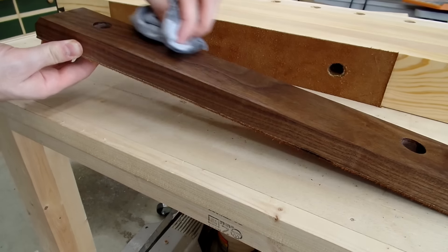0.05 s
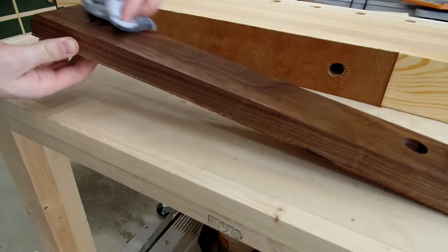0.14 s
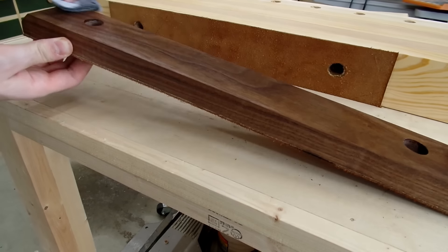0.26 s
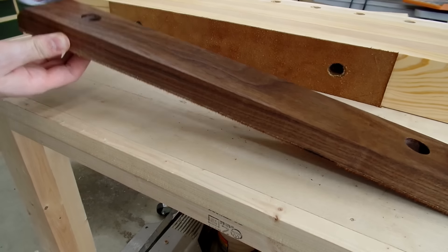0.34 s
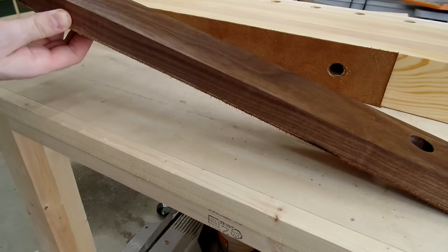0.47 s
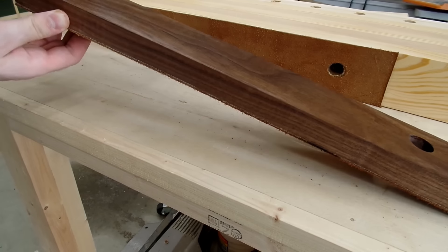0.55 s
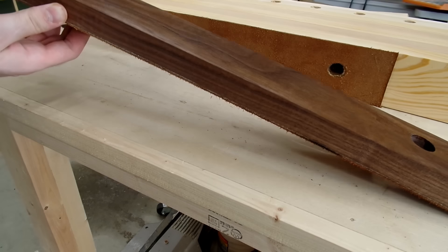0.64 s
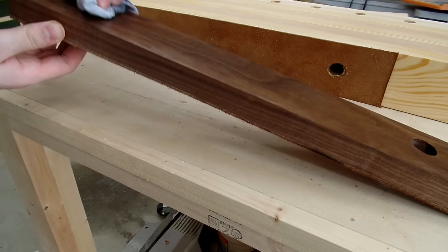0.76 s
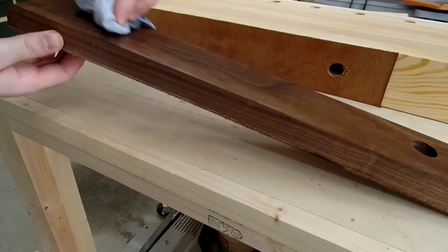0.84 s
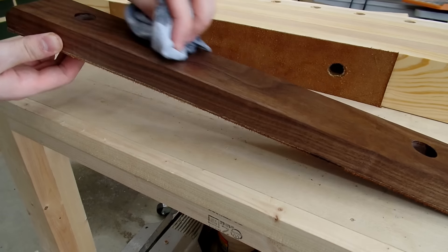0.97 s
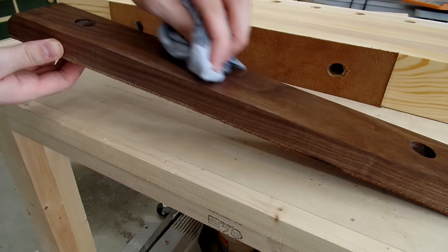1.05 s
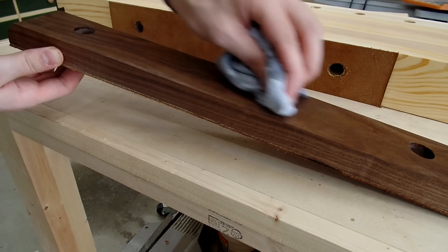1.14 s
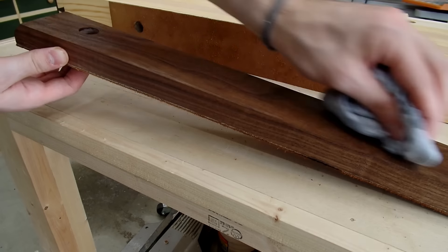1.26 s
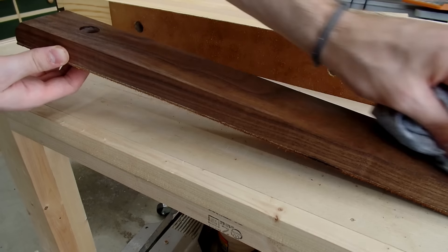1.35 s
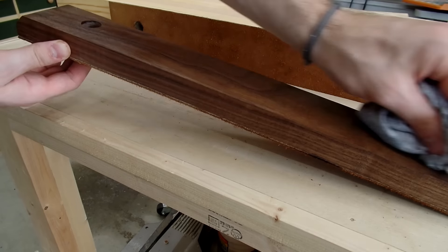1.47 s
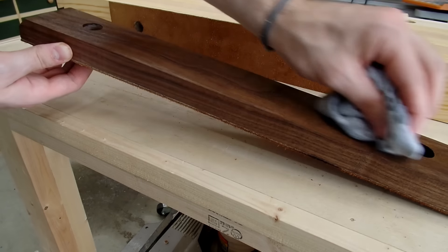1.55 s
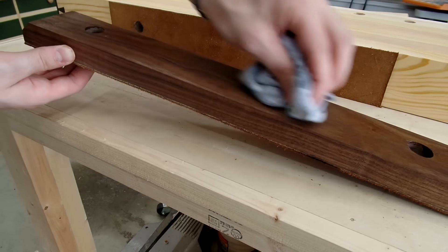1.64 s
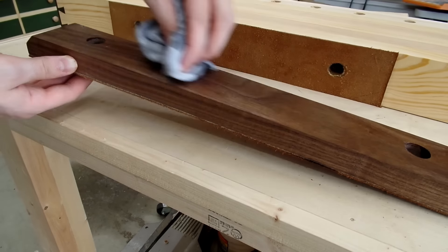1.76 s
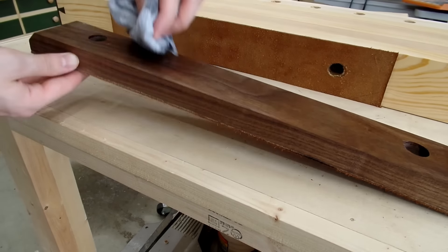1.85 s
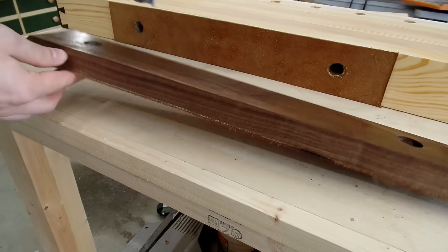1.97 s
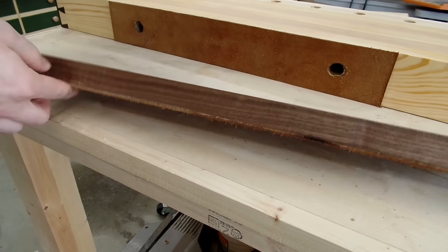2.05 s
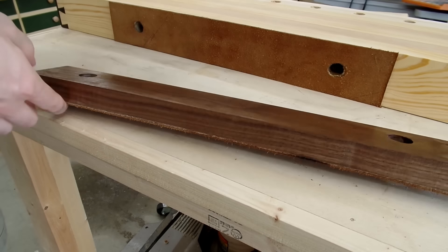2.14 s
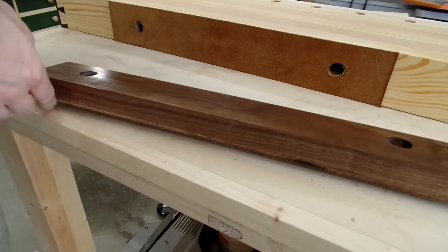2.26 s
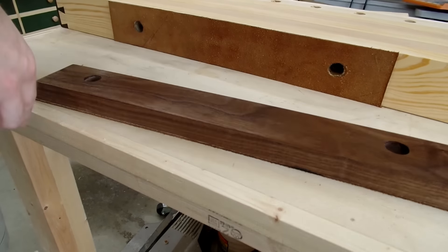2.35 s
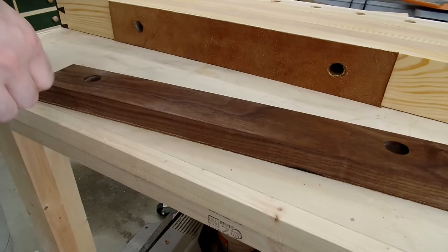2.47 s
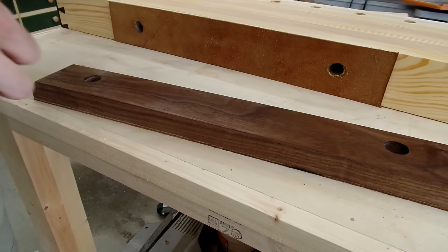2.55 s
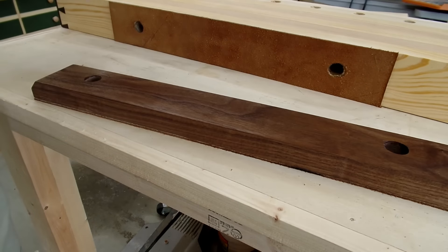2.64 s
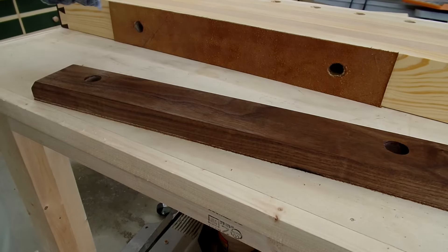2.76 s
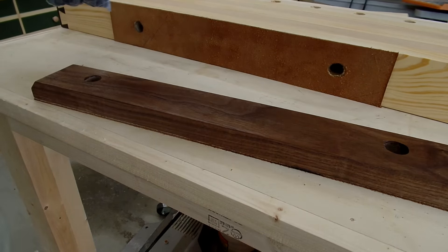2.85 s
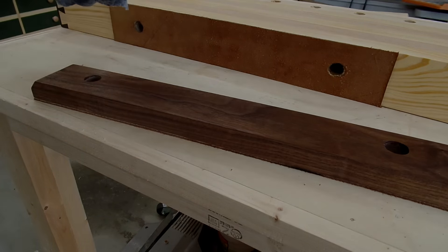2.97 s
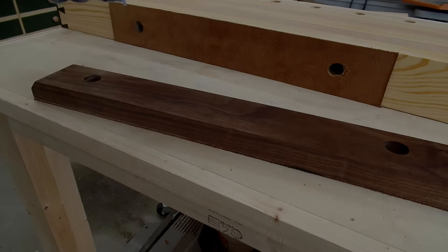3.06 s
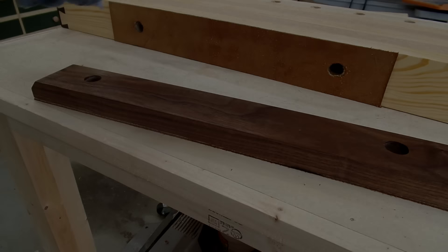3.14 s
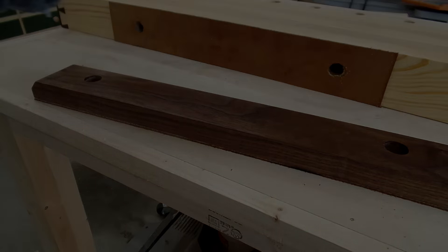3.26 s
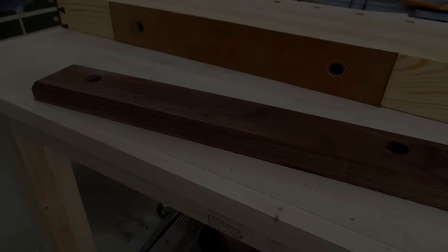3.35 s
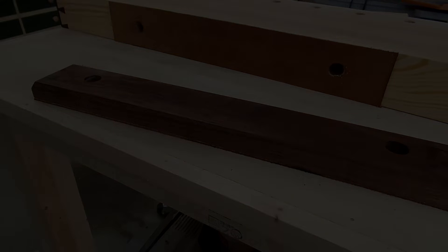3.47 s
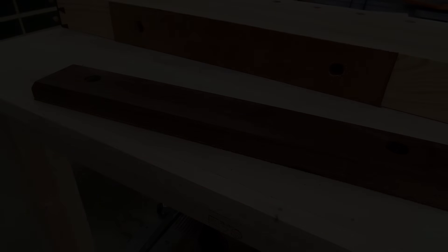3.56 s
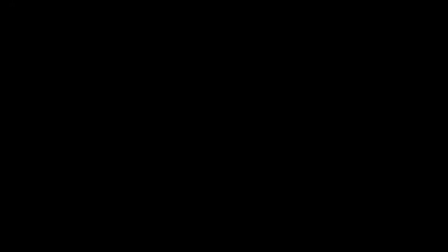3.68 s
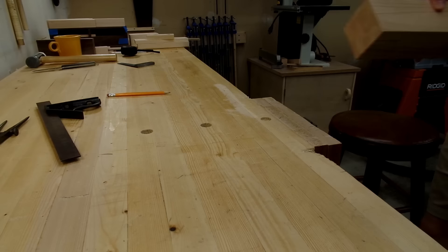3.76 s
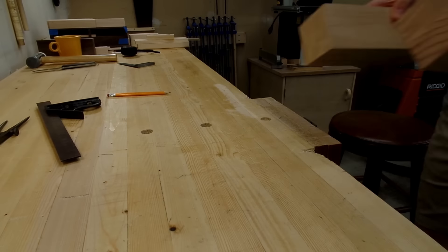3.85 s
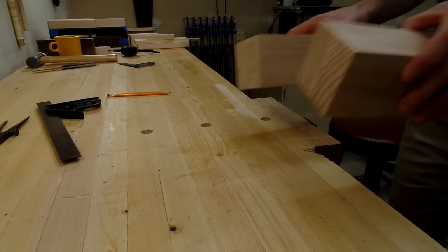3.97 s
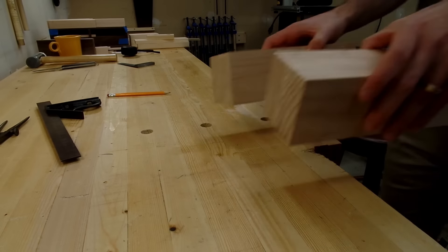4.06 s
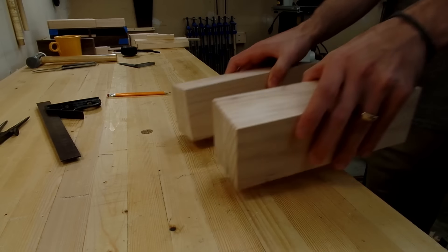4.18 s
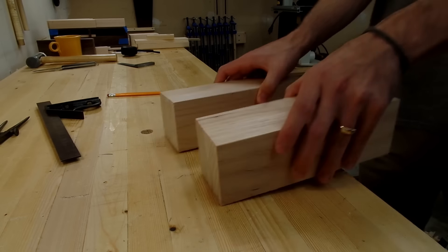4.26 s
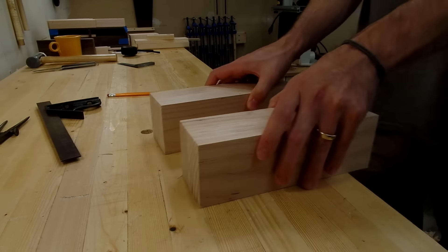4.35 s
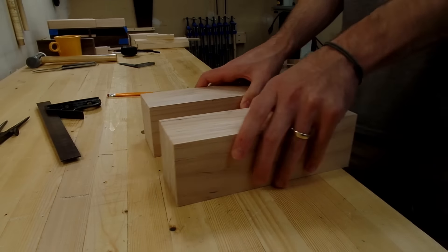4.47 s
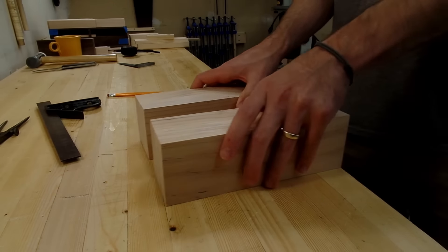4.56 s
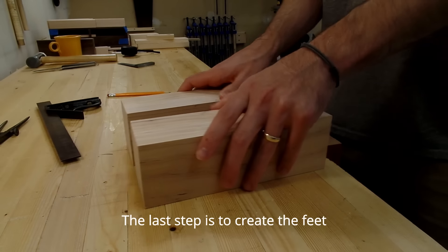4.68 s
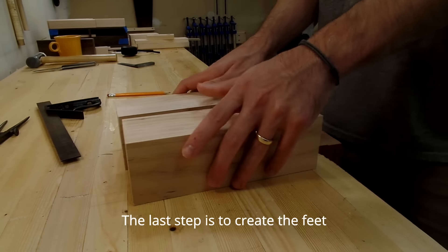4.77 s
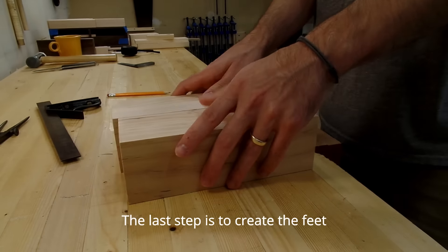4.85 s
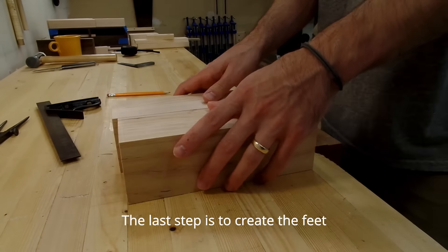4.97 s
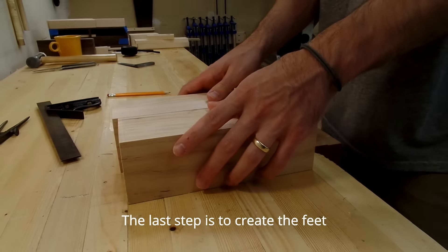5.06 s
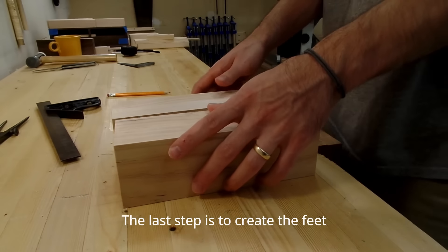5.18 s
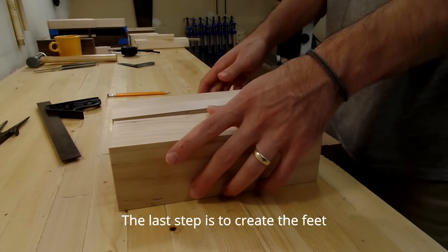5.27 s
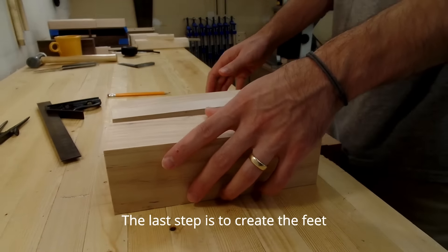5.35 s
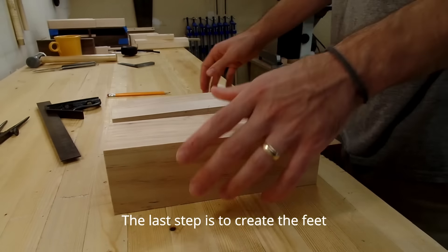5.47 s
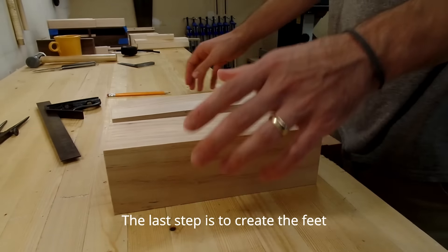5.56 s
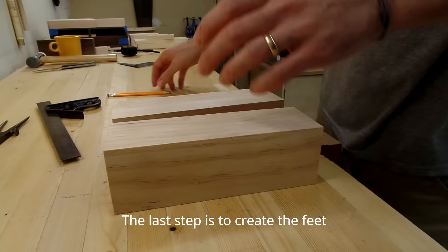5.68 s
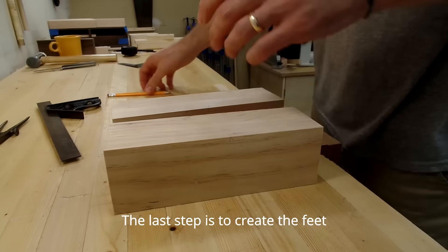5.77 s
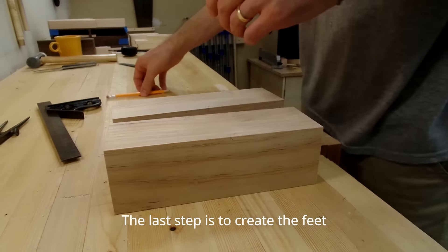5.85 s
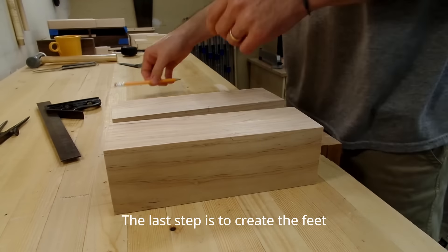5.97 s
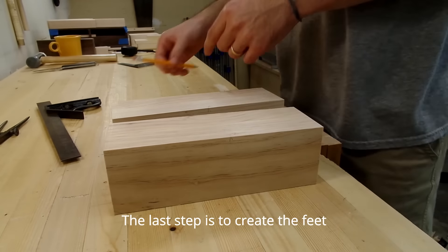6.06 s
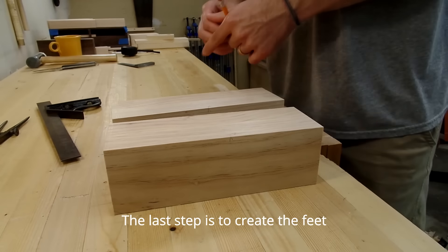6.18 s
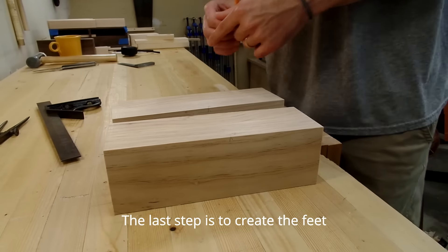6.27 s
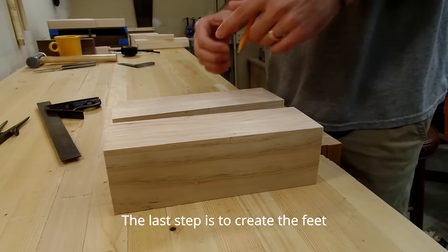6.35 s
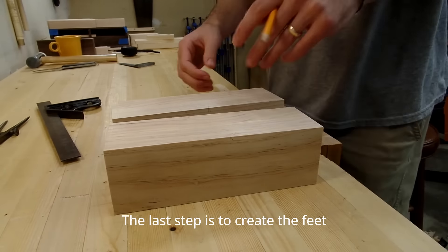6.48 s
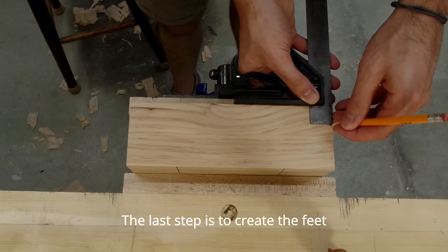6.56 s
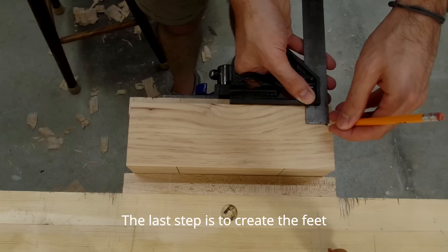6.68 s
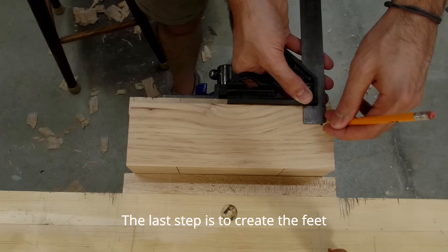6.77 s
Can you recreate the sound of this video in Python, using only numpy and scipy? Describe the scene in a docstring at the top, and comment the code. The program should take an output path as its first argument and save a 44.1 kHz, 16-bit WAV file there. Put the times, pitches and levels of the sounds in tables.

```python
"""A workshop bench. First a rag rubs oil along a plank (noise strokes) over a rumble that dies away (shaped
noise and a drone). The plank is laid down with two knocks: damped swings that ring wood modes and echo.
Abruptly a quieter moment swells up: two wooden blocks land, clack together and slide under the hands; a
pencil is picked up. Small ticks, taps and scuffs come throughout. Loud knocks overload the microphone."""
import sys
import numpy as np
from scipy import signal
from scipy.fft import rfft, irfft, next_fast_len
from scipy.io import wavfile
from scipy.ndimage import uniform_filter1d

SR = 44100
rng = np.random.default_rng(int(sys.argv[2]) if len(sys.argv) > 2 else 0)


def file_out(sig):
    """Save sig as 16-bit WAV at sys.argv[1]."""
    # one column per channel
    cols = np.atleast_2d(sig).T
    # limit, then scale
    lim = np.clip(cols, -1, 1)
    pcm = np.round(lim * 32767).astype(np.int16)
    wavfile.write(sys.argv[1], SR, pcm)


N = 300745
CHANGE_S = 3.823  # early rumble and rubbing stop dead, the quieter moment starts


def amp(db):
    """Decibels to gain."""
    return 10 ** (np.asarray(db) / 20)


def evened(x):
    """Scales to rms 1."""
    return x / np.sqrt(np.mean(x ** 2) + 1e-20)


def read(points, hz):
    """Interpolates a curve on a log-frequency axis."""
    f, value = np.transpose(points)
    return np.interp(np.log(hz + 1), np.log(f + 1), value)


def add(mix, start_s, sound):
    """Mixes a sound in at a time."""
    part = mix[round(start_s * SR):][:len(sound)]
    part += sound[:len(part)]


def noise(shape, size, patchy_db, flicker_db, tones=()):
    """Random short-time spectra with drifting patches, shared flicker and optional resonances; rms 1."""
    frames = 4 * N // size + 5
    hz = np.fft.rfftfreq(size, 1 / SR)
    real, imag, patches = rng.standard_normal((frames, len(hz), 3)).T
    patches = uniform_filter1d(patches, size=8, axis=0)  # across frequency
    patches = evened(uniform_filter1d(patches, size=10, axis=1))  # across time
    flicker = evened(uniform_filter1d(rng.standard_normal(frames), size=3))
    level_db = read(shape, hz)[:, None] + patchy_db * patches + flicker_db * flicker
    lift = np.ones(len(hz))
    for pitch_hz, width_hz, gain_db in tones:
        lift += amp(gain_db) / (1 + (2 * (hz - pitch_hz) / width_hz) ** 2)
    spectra = (real + 1j * imag) * amp(level_db) * lift[:, None]
    return evened(signal.istft(spectra, nperseg=size, noverlap=3 * size // 4)[1][:N])


# strokes of the rag, and faint steady hiss between them: start_s, rise_s, fall_s, hiss_db at the turn,
# drop_at_start_db, drop_at_end_db, scrape_above_hiss_db, sheen_above_hiss_db
RAG_STROKES = [(0, 0.15, 0.33, -47, 3, 6, -2, 5), (0, .5, 1.68, -57, -1, 7, 7, -1),
               (.775, 0.43, .35, -54.5, 0, 0.5, 3, 3), (1.36, 0.099, 0.16, -62, 1, 1.5, 9, -4),
               (1.63, 0.11, 0.45, -56, 0, -2, 0.5, 5.5), (2.2, 0.42, 1.02, -69.5, -2, 0, 7, -1),
               (2.32, 0.023, .02, -59, 3, 11, -5, 8.5), (2.55, 0.079, 0.055, -71, 5, 3, 8, 10),
               (2.71, .04, .03, -68, 5, 13, 0, 10), (3.1, 0.19, 0.22, -63, 8, 6, 5, -5),
               (3.64, 0.15, 0.019, -56.5, 2.5, 2, -0.5, 6)]
# blocks, hands and sleeves sliding: the same columns, then drag_above_hiss_db
SLIDES = [(4.5, 1, 0.011, -50.5, 0.5, 5.7, -2, -0.5, -1), (4.95, 0.12, 0.043, -47, 8, 17, 2, -1, -14),
          (5.165, 0.055, 0.06, -47.5, 6.5, 8.4, 6, 9.5, -11.5),
          (5.3, 0.044, 0.21, -58, 7, 7.5, -3.5, -7, -12),
          (5.685, 0.056, 0.22, -58, -0.5, 7.9, 0.5, 2.5, -2.5),
          (5.97, .01, 0.093, -64, -1.5, 8.3, 0.5, -0.5, 5.5),
          (6.155, 0.12, 0.097, -53, 5.5, 3.9, 4.5, 0.5, -27),
          (6.36, .12, 0.1, -51, 3.5, 1.3, 4.5, 0.5, -16),
          (6.46, 0.13, 0.065, -47.5, 6, 9.7, 2.5, 4.5, -5.5)]
SLIDES_STOP_S = 6.663
ATTACK_S, RELEASE_DB_PER_S = .02, 230


def strokes(rows, stop_s):
    """Sums the rows' powers into gain curves: hiss, then each layer that rides on it; a dead stop at stop_s."""
    t, power = np.arange(N) / SR, 0
    for start_s, rise_s, fall_s, turn_db, start_drop_db, end_drop_db, *above_hiss_db in rows:
        turn_s = start_s + rise_s
        end_s = turn_s + fall_s
        drop_db = np.interp(t, [start_s, turn_s, end_s, end_s + 1],
                            [start_drop_db, 0, end_drop_db, end_drop_db + RELEASE_DB_PER_S])
        attack = np.clip((t - start_s) / ATTACK_S + (start_s == 0), 0, 1)  # already sounding at 0 s
        touch = attack * amp(turn_db - drop_db) * (t < stop_s)
        power = power + (touch * amp([0, *above_hiss_db])[:, None]) ** 2
    return np.sqrt(power)


RISE_END_S, RISE_DB_PER_S = 4.08, 85


def rise():
    """Silent before the change, then a swell from about -22 dB to full level."""
    t = np.arange(N) / SR
    return amp(-RISE_DB_PER_S * np.maximum(RISE_END_S - t, 0)) * (t >= CHANGE_S)


# spectrum of the noise floor: freq_hz, relative_db_per_hz
FLOOR = [(12, -34.5), (20, 3.5), (162, 4.5), (637, -9), (713, -6.5), (916, -10), (2430, -17),
         (15800, -26.5)]
FLOOR_DB = -75


def noise_floor():
    """Steady faint noise floor of the microphone."""
    return amp(FLOOR_DB) * noise(FLOOR, size=2048, patchy_db=1.5, flicker_db=2.0)


# spectra of the rumble's layers: freq_hz, relative_db_per_hz
DEEP = [(10, -5), (25, -17), (60, 8), (90, -7), (200, -24.5)]
BOOM = [(40, -30), (70, -9), (100, 3), (280, -2.5), (420, -4.5), (900, -48), (3000, -62)]
ROAR = [(200, -27.5), (450, 3), (900, -1.5), (1400, -4), (2200, -22), (5000, -32.5)]
# resonances of the shop: pitch_hz, width_hz, added_gain_db
SHOP_TONES = [(93.8, 25, 5), (150, 11, 1), (205, 5.9, 1.5), (242.8, 18, 12), (301, 14, 4.5),
              (467.8, 6.7, 10), (644, 32, -1.5), (836, 13, -2), (937, 21, 3), (1130, 64, -4),
              (1295, 30, -4.5)]
# deep air against the rumble: plank_in_hand_db, plank_down_db, after_change_db
DEEP_DB = (-19.5, -8, -0.5)
RUMBLE_DB, RUMBLE_FADE_DB_PER_S, RUMBLE_REST_DB = -37, 5.0, -53.5
PLANK_DOWN_S, PLANK_DOWN_DB = 2.4, -8  # on the bench the plank stops sounding the rumble
ROAR_DB, ROAR_DROP_DB, ROAR_DROP_S = 2.5, 10.5, 1  # against the rumble; drop time constant
DRONE_HZ, DRONE_DB, DRONE_FADE_DB_PER_S = 97.4, -3, 10  # level and fade against the rumble
BENCH_DB, BENCH_FOLLOW_POWER, BENCH_ROAR_DB = -66, 0.23, -3.5  # after the change
REST_DB = -74  # hiss while nothing slides


def rumble(slides):
    """Deep air movement, boom, roar and drone; they die away, then the bench rumbles in step with slides."""
    t = np.arange(N) / SR
    early, down = t < CHANGE_S, t > PLANK_DOWN_S
    fading = amp(RUMBLE_DB - RUMBLE_FADE_DB_PER_S * t + PLANK_DOWN_DB * down)
    dying = np.hypot(fading, amp(RUMBLE_REST_DB))
    bench = amp(BENCH_DB) * rise() * (1 + slides[0] / amp(REST_DB)) ** BENCH_FOLLOW_POWER
    level = np.where(early, dying, bench)
    early_roar_db = ROAR_DB - ROAR_DROP_DB * (1 - np.exp(-t / ROAR_DROP_S))
    roar_gain = amp(np.where(early, early_roar_db, BENCH_ROAR_DB))
    deep_gain = amp(np.choose(down.astype(int) + ~early, DEEP_DB))
    deep = noise(DEEP, size=4096, patchy_db=.5, flicker_db=.5)
    boom = noise(BOOM, size=4096, patchy_db=1.23, flicker_db=0.47, tones=SHOP_TONES)
    roar = noise(ROAR, size=2048, patchy_db=1.15, flicker_db=0.1, tones=SHOP_TONES)
    waver = evened(uniform_filter1d(rng.standard_normal(N), size=8000))
    drone = np.sin(2 * np.pi * np.cumsum(DRONE_HZ * (1 + .015 * waver)) / SR) * early
    low = boom + deep_gain * deep + amp(DRONE_DB - DRONE_FADE_DB_PER_S * t) * drone
    drag = slides[-1]
    return level * low + np.hypot(level * roar_gain, drag) * roar


# faint low tone: start_s, end_s, pitch_hz, level_db
FAINT_HUM = (6.05, 6.62, 186, -69)


def hum():
    """A sine that swells and fades."""
    start_s, end_s, pitch_hz, level_db = FAINT_HUM
    out, t = np.zeros(N), np.arange(0, end_s - start_s, 1 / SR)
    tone = np.sin(2 * np.pi * pitch_hz * t) * signal.windows.tukey(len(t), .4)
    add(out, start_s, amp(level_db) * tone)
    return out


# small dry ticks: start_s, level_db before decay, pitch_hz
TICKS = [(0.3418, -35.5, 5500), (0.7433, -27.5, 5030), (0.7607, -31.5, 5940), (1.7774, -31, 5660),
         (2.3795, -48, 4860), (2.9796, -46, 4940), (3.767, -34, 4950), (3.9215, -56, 5680),
         (3.9506, -56.5, 4950), (5.51, -40, 5030), (5.526, -35, 5270), (6.0726, -40, 5010)]
# spells of faint even ticking: start_s, end_s, level_db before decay and spread
TICKING = [(2.415, 2.85, -48), (3.15, 3.7, -43), (5.624, 6.05, -48)]
TICKING_PERIOD_S, TICKING_HZ, TICKING_SPREAD_DB = .1002, 5500, 3.5


def ticks():
    """Short decaying high tones, singly or at an even pace."""
    out, t = np.zeros(N), np.arange(600) / SR
    even = []
    for first_s, end_s, mean_db in TICKING:
        for start_s in np.arange(first_s, end_s, TICKING_PERIOD_S):
            level_db = mean_db + TICKING_SPREAD_DB * rng.standard_normal()
            even.append((start_s, level_db, TICKING_HZ * rng.uniform(.95, 1.05)))
    for start_s, level_db, pitch_hz in TICKS + even:
        envelope = amp(level_db - 60 * t / .005) * np.minimum(t / .0004, 1)
        add(out, start_s, envelope * np.sin(2 * np.pi * pitch_hz * t))
    return out


# light hard taps: start_s, level_db before decay, ring_hz, ring_rel_db, tail_rel_db, tail_t60_s
TAPS = [(4.0528, -27, 5530, -17, -17, 0.34), (4.056, -40, 1990, -20, -22, .09),
        (4.06, -45.5, 1600, -15, -26, .09), (5.956, -32.5, 3040, -12.5, -10.5, 0.12)]


def taps():
    """A white click, a brief ring and a bright noise rattle of nearby reflections."""
    out, t = np.zeros(N), np.arange(SR // 4) / SR
    for start_s, level_db, ring_hz, ring_db, tail_db, tail_t60_s in TAPS:
        click, tail = rng.standard_normal((2, len(t)))
        click *= amp(-60 * t / 0.0085)
        ring = amp(ring_db - 60 * t / 0.044) * np.sin(2 * np.pi * ring_hz * t)
        tail *= amp(tail_db - 60 * t / tail_t60_s)
        add(out, start_s, amp(level_db) * (click + ring + tail))
    return out


# short coarse scuffs: middle_s, length_s, pitch_hz, level_db before the window
SCUFFS = [(5.235, 0.069, 2000, -39), (5.815, 0.17, 1270, -51), (3.99, 0.18, 1900, -69),
          (1.45, 0.095, 2100, -52)]


def scuffs():
    """A brief drag: noise banded around one pitch under a smooth hump."""
    out = np.zeros(N)
    for middle_s, length_s, pitch_hz, level_db in SCUFFS:
        band = signal.butter(2, [pitch_hz / 1.7, pitch_hz * 1.7], "band", fs=SR)
        drag = signal.lfilter(*band, rng.standard_normal(SR // 2))[:round(length_s * SR)]
        add(out, middle_s - length_s / 2, amp(level_db) * evened(drag) * np.hanning(len(drag)))
    return out


# hollow band in the first stroke: pitch_hz, width_hz, level_db before fade, hold_s, fade_db_per_s
FIRST_BODY = (882, 128, -39.5, 0.13, 64.5)


def first_body():
    """Noise in one wide resonance that holds, then fades."""
    pitch_hz, width_hz, level_db, hold_s, fade_db_per_s = FIRST_BODY
    t = np.arange(N) / SR
    band = signal.lfilter(*signal.iirpeak(pitch_hz, pitch_hz / width_hz, SR), rng.standard_normal(N))
    return evened(band) * amp(level_db - fade_db_per_s * np.maximum(t - hold_s, 0))


FIBRES_PER_S, FIBRE_SPREAD_DB = 2500, 2


def fibres(shape):
    """Single fibres catch: scattered impulses of uneven size, coloured by a spectrum."""
    caught = rng.random(N) < FIBRES_PER_S / SR
    strength = amp(FIBRE_SPREAD_DB * np.minimum(rng.exponential(size=N), 4))
    catches = caught * strength * rng.choice([-1., 1.], N)
    size = next_fast_len(N)
    colour = amp(read(shape, np.fft.rfftfreq(size, 1 / SR)))
    return evened(irfft(rfft(catches, size) * colour, size)[:N])


# spectra of the friction layers: freq_hz, relative_db_per_hz
HISS = [(1500, -26), (4000, -1.5), (6000, -2), (9500, -2.5), (12000, -11.5), (16000, -31)]
SCRAPE = [(500, -17), (1100, 1), (2000, 0), (3500, -5.5), (5500, -15.5), (9000, -35)]  # of the rag
RUSTLE = [(500, -15), (1200, -2), (2000, 0.5), (3200, -1.5), (5500, -7), (9000, -28)]  # of the slides
SHEEN = [(7000, -38), (10500, -3.5), (12500, -2), (16000, 0)]
FIBRE_SHARE = 0.27  # of the scrape's power
REST_SCRAPE_DB, REST_SHEEN_DB = 5.5, -1  # against REST_DB


def rubbing(rag, slides):
    """Countless fibres slip: fine hiss, a coarser scrape from the grain, a sheen from the smoothest contact."""
    rest = amp(REST_DB + np.array([[0], [REST_SCRAPE_DB], [REST_SHEEN_DB]])) * rise()
    hiss = noise(HISS, size=256, patchy_db=1.0, flicker_db=1.06)
    scrape = noise(SCRAPE, size=512, patchy_db=1.5, flicker_db=0.5)
    scrape = np.sqrt(1 - FIBRE_SHARE) * scrape + np.sqrt(FIBRE_SHARE) * fibres(SCRAPE)
    rustle = noise(RUSTLE, size=512, patchy_db=1.5, flicker_db=0.2)
    sheen = noise(SHEEN, size=256, patchy_db=2.5, flicker_db=0.5)
    coarse = np.where(np.arange(N) < CHANGE_S * SR, scrape, rustle)
    gains = np.sqrt(rag ** 2 + slides[:-1] ** 2 + rest ** 2)
    return (gains * [hiss, coarse, sheen]).sum(axis=0) + first_body()


# decay of the shop's echoes: freq_hz, t60_s
SHOP_DECAY = [(80, 0.36), (250, 0.29), (600, 0.27), (1500, 0.29), (3000, .24), (5000, 0.24), (10000, 0.22)]


def shop(x):
    """Sparse echoes of random sign, each band dying at its own speed."""
    echoes = np.zeros(SR // 2)
    slots = np.arange(200, SR // 2 - 8, 8)
    echoes[slots + rng.integers(0, 8, len(slots))] = rng.choice([-1., 1.], len(slots))
    hz, t, spectra = signal.stft(echoes, SR, nperseg=256)
    decay = amp(-60 * t / read(SHOP_DECAY, hz)[:, None])
    tail = signal.istft(spectra * decay, SR, nperseg=256)[1]
    return signal.fftconvolve(x, tail / np.linalg.norm(tail))[:N]


# wood meeting wood: start_s, blow_db, contact_hz, crack_db before decay, crack_hz,
# tick_db before smoothing and decay, echo_db
PLANK_KNOCKS = [(2.182, 3.5, 290.5, -13.5, 1315, -38, -12), (2.190, -7, 544.7, -25.5, 3890, -52, -15.5),
                (2.197, -6.5, 520, -32, 2428, -25, -5), (2.4495, -12, 307, -44, 1000, -38, -3),
                (2.456, -9.5, 545, -31, 1310, -52, -2.5), (2.464, -11, 360, -26.5, 2300, -52, -8.5),
                (3.0025, -35.5, 895, -44, 3030, -56, 2.5)]
BLOCK_KNOCKS = [(4.352, -13.5, 340, -33.5, 3330, -40.5, 2), (4.388, -13, 442, -37, 4500, -40.5, -2),
                (4.4085, -7, 750, -10.5, 3050, -18, -6), (4.412, -8, 593, -13, 2582, -34.5, -3),
                (4.417, -6.5, 1040, -19.5, 1900, -38, -5), (4.423, -13.5, 885, -34, 2900, -36, -20),
                (4.4525, 2, 683, -12.5, 1800, -21.5, -5), (4.458, -1, 740, -24.5, 2350, -45.5, -9),
                (4.462, -3.5, 596, -22, 2200, -41.5, -23), (4.473, -9, 398, -29, 2200, -49.5, -3),
                (4.931, 2, 970, -28, 2900, -38, -6), (4.942, 4, 1160, -17.5, 3500, -34.5, -9),
                (5.705, -38.5, 222, -55, 1500, -67, -2), (5.735, -45, 180, -68, 1500, -78, 0)]
# modes of plank and bench, of blocks and bench: pitch_hz, relative_db, t60_s
PLANK_MODES = [(152.7, -6.5, 0.13), (231.6, -6, 0.19), (302.6, -8, 0.18), (444, -14, 0.13), (546, -10, .05),
               (624.5, -9, 0.119), (895, -10.5, 0.07), (1174, -16.5, 0.092), (1462, -12.5, .07),
               (2110, -25, .08)]
BLOCK_MODES = [(114, -5, .11), (156, -9, .12), (307, -0.5, 0.054), (424, -11, 0.12), (545, -7.5, .12),
               (614, -6, 0.098), (727, -8.5, 0.084), (809, -12, 0.12), (984, -4, 0.092), (1117, 2.5, 0.08),
               (1258, -6.5, 0.11), (1374, -4.5, 0.1), (1530, -6, 0.15), (1840, -9, 0.0344),
               (2380, -14, 0.061), (2960, -10, 0.031), (3350, -11, 0.053)]


def knocks(events, modes, cycles, ring_db, crack_t60_s, crack_echo_db, bass_cut_hz):
    """Each blow is a short damped swing that rings the wood's modes, with a rough crack at contact."""
    near, far, t = np.zeros(N), np.zeros(N), np.arange(SR // 4) / SR
    for start_s, blow_db, contact_hz, crack_db, crack_hz, tick_db, echo_db in events:
        turns = contact_hz * t
        envelope = turns / cycles * np.exp(1 - turns / cycles) * (1 - np.exp(-12 * turns))
        swing = -np.sin(2 * np.pi * turns) * envelope

        ring = np.zeros(len(t))
        phases = rng.random(len(modes))  # random starting phase for each mode
        for (mode_hz, mode_db, t60_s), phase in zip(modes, phases):
            # modes ring a little weaker the further they lie from the contact pitch
            stirred_db = mode_db - 1.5 * np.log2(mode_hz / contact_hz) ** 2
            ring += amp(stirred_db - 60 * t / t60_s) * np.sin(2 * np.pi * (mode_hz * t + phase))
        ring *= np.minimum(turns, 1)
        thud = amp(blow_db) * (swing + amp(ring_db) * ring / abs(ring).max())

        band = signal.butter(3, [crack_hz / 2.2, crack_hz * 1.2], "band", fs=SR)
        crack = evened(signal.lfilter(*band, rng.standard_normal(len(t))))
        crack *= amp(crack_db - 60 * t / crack_t60_s)
        tick = rng.standard_normal(len(t)) * amp(tick_db - 60 * t / .006)
        tick = uniform_filter1d(tick, size=2)

        # the room hears the crack as one even snap
        snap_band = signal.butter(2, [crack_hz / 3, crack_hz * 1.25], "band", fs=SR)
        snap = signal.lfilter(*snap_band, t == 0)
        snap *= np.linalg.norm(crack) / np.linalg.norm(snap)
        to_room = thud + amp(4.5) * tick + amp(crack_echo_db) * snap
        add(near, start_s, thud + crack + tick)
        add(far, start_s, shop(amp(echo_db) * to_room))  # new echoes for each blow
    # the microphone picks up little deep bass from the knocks
    bass_cut = signal.butter(4, bass_cut_hz, "high", fs=SR)
    return signal.lfilter(*bass_cut, near + far)


def scene():
    """Knocks in the room over noise floor, rumble, rubbing and small sounds."""
    rag, slides = strokes(RAG_STROKES, CHANGE_S), strokes(SLIDES, SLIDES_STOP_S)
    background = noise_floor() + rumble(slides) + hum()
    small = ticks() + taps() + scuffs()
    plank = knocks(PLANK_KNOCKS, PLANK_MODES, cycles=0.42, ring_db=-13.5,
                   crack_t60_s=0.022, crack_echo_db=5.5, bass_cut_hz=121.0)
    blocks = knocks(BLOCK_KNOCKS, BLOCK_MODES, cycles=0.37, ring_db=-13.5,
                    crack_t60_s=0.018, crack_echo_db=1, bass_cut_hz=79)
    return (background + small + rubbing(rag, slides) + plank + blocks)[None]


OVERLOAD, EDGE_HZ = .72, 15950  # clip level against full scale, low-pass edge


def record(dry):
    """Microphone overload clips the peaks hard, then a steep low-pass limits the band."""
    clipped = np.clip(dry, -OVERLOAD, OVERLOAD)
    lowpass = signal.firwin(511, EDGE_HZ, window=("kaiser", 9), fs=SR)
    return signal.oaconvolve(clipped, lowpass[None], "same")


dry = scene()
out = record(dry)
file_out(out)
```